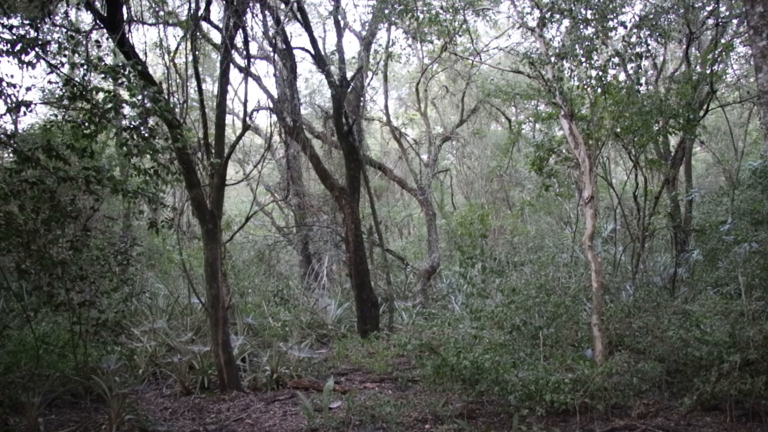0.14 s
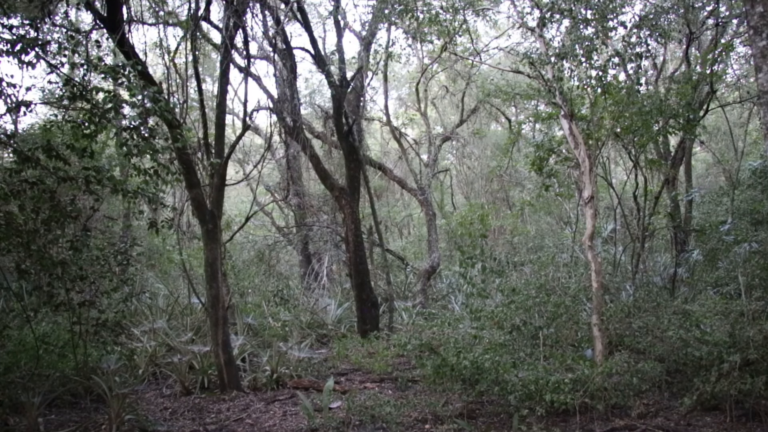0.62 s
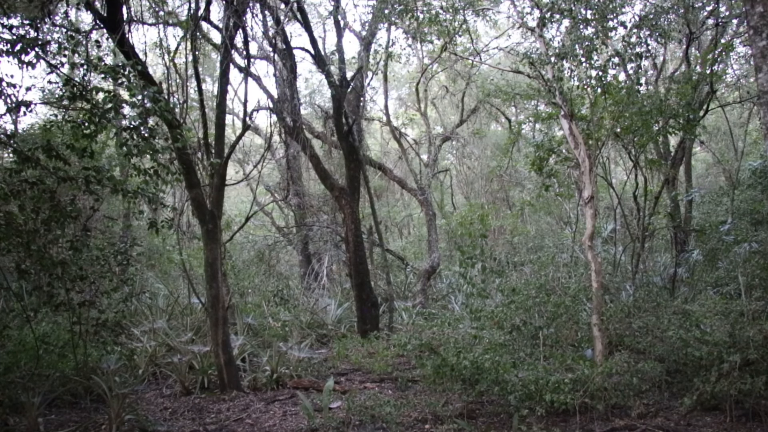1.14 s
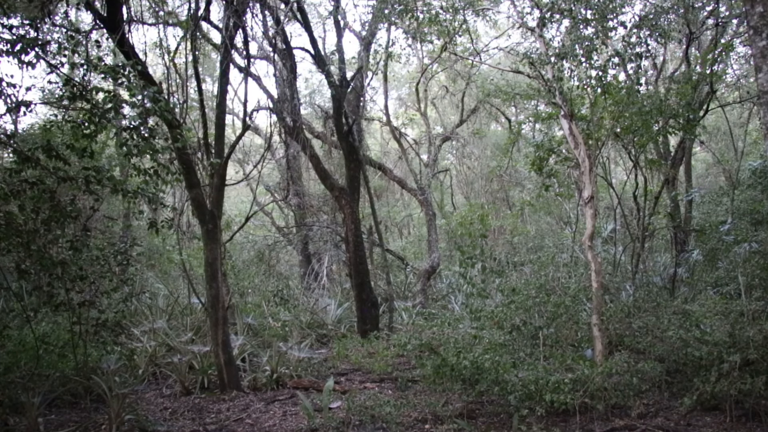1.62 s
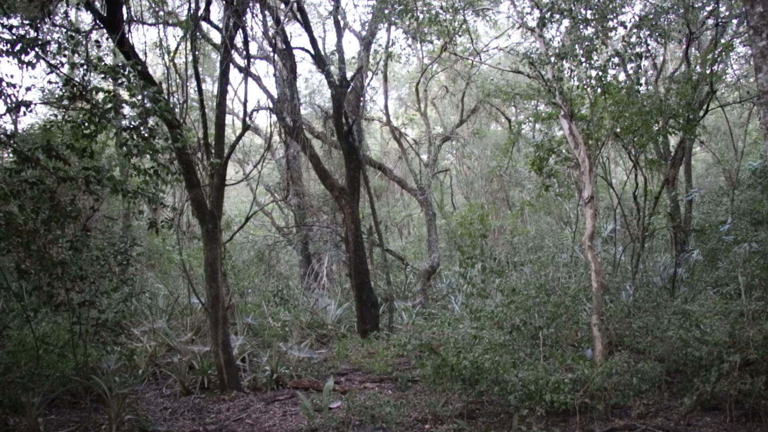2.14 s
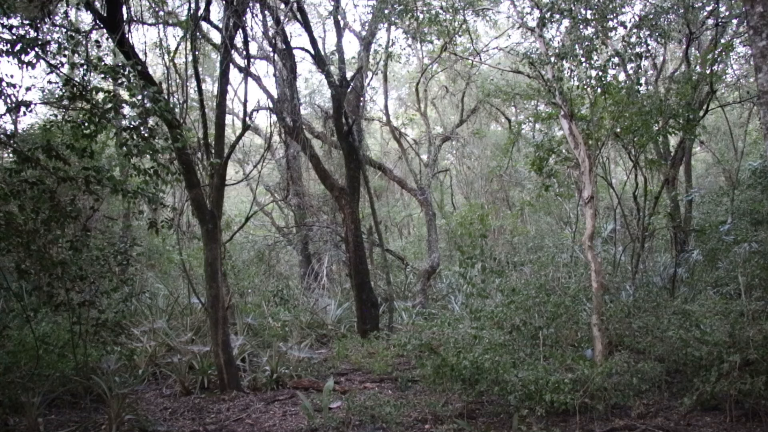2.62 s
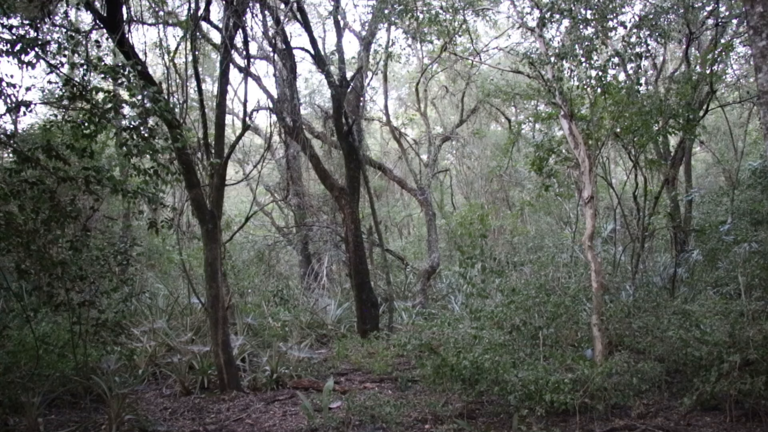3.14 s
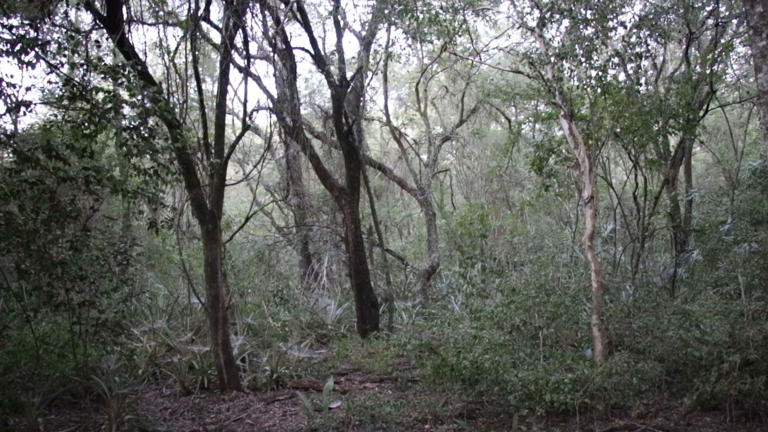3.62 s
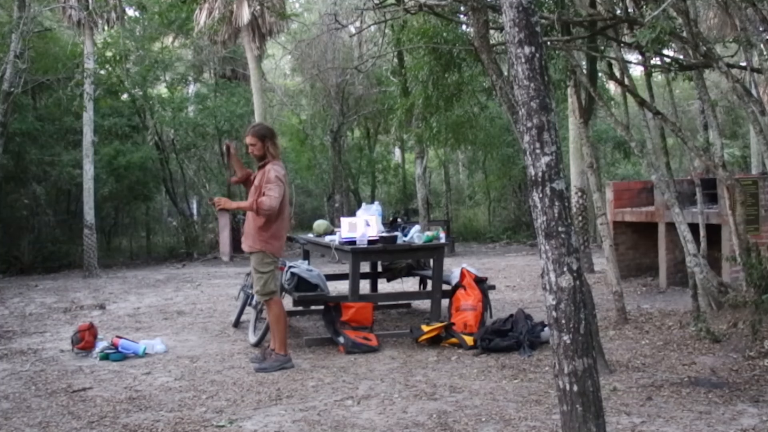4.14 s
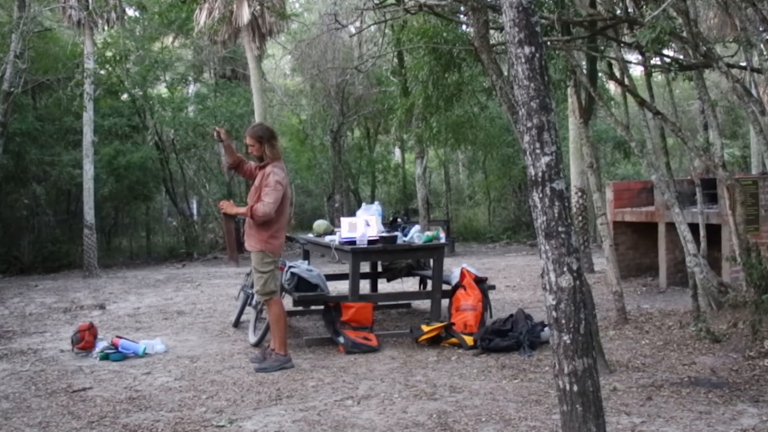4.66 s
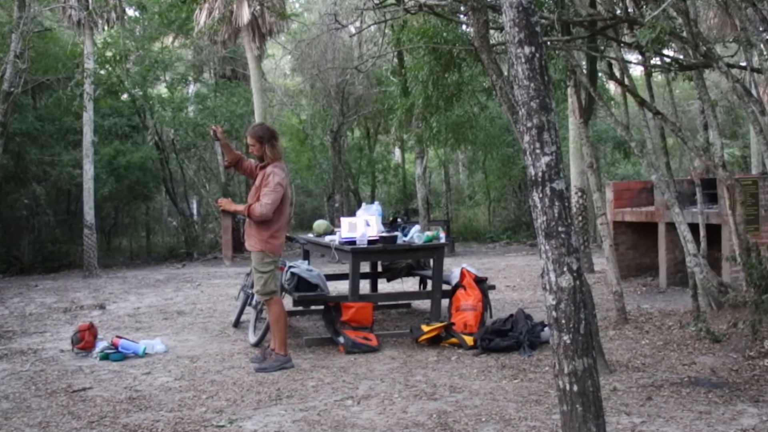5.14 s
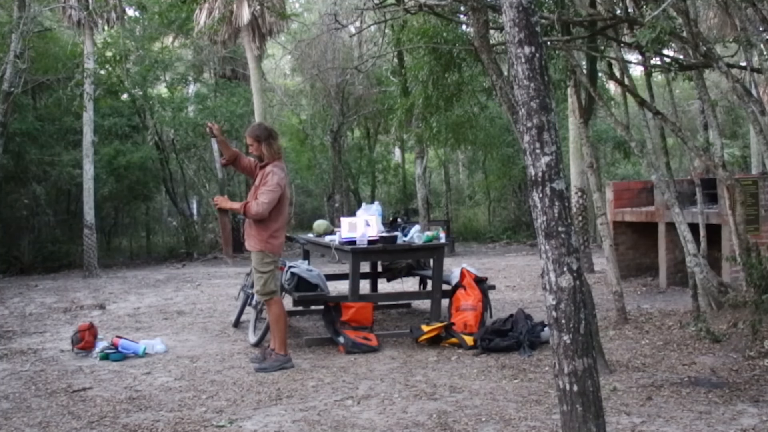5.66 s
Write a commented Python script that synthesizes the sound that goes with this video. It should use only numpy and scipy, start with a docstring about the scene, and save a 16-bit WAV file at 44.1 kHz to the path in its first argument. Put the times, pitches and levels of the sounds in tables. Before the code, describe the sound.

Loud shrill cicadas in a dusk forest: a steady piercing buzz, a sweeping hiss, and a fast chirping trill that stops near the end.

```python
"""Cicadas sing in a forest at dusk, heard by one microphone. From the start, one buzzes steadily near 9 kHz with ringing
ribs, one bends its body so that the hiss of its clicks sweeps down and up, and one trills rising chirps near 3 kHz by
striking the tones of its body. Trunks scatter them all as echoes, and a far chorus and still air, both shaped noise,
fill the gaps over a low murmur that comes and goes. A distant animal hoots faintly, a wavering tone with its octave,
at about 1.7 s and again at about 4.1 s. The trill breaks off at about 4.7 s, and the other singers go on."""
import sys
import numpy as np
from scipy import signal
from scipy.fft import rfft, irfft, next_fast_len
from scipy.io import wavfile
from scipy.ndimage import uniform_filter1d

SR = 44100
rng = np.random.default_rng(int(sys.argv[2]) if len(sys.argv) > 2 else 0)


def ratio(d):
    """dB to gain"""
    e = np.asarray(d, float) / 20
    return 10 ** e


def transcribe(u):
    """Save the signal u as a 16-bit wav file named by the first command-line argument.

    u: samples, shape (n,) or (channels, n), limited to [-1, 1]; the rate is SR.
    q: integer samples, one column per channel.
    """
    v = np.clip(np.atleast_2d(u).T, -1, 1)
    q = np.round(v * 32767).astype(np.int16)
    wavfile.write(sys.argv[1], SR, q)


N = 254236  # length of the scene in samples


def unit(x):
    """Scales x to an rms of 1."""
    return x / np.sqrt(np.mean(x ** 2) + 1e-20)


def along(points, hz):
    """Reads each column after the frequency at the pitches hz, on a log axis."""
    f, *cols = np.transpose(points)
    return [np.interp(np.log(hz + 1), np.log(f + 1), c) for c in cols]


def curves(rows, t):
    """Reads each column after the time at the times t."""
    s, *cols = np.transpose(rows)
    return [np.interp(t, s, c) for c in cols]


def coloured(x, spectrum):
    """Makes each pitch in x louder or softer, as the (Hz, dB) spectrum says."""
    m = next_fast_len(N + 8192)
    gain = ratio(along(spectrum, np.fft.rfftfreq(m, 1 / SR))[0])
    return irfft(rfft(x, m) * gain, m)[:N]


def band(x, low_hz, high_hz, order):
    """Steep band-pass filter that never looks ahead in time."""
    return signal.sosfilt(signal.butter(order, [low_hz, high_hz], "bandpass", fs=SR, output="sos"), x)


def rings(s, hz, t60, size, length=256):
    """One dying sine per click, starting at time s; it falls at a rate of 60 dB in t60 seconds."""
    start = np.ceil(s * SR).astype(int)[:, None] + np.arange(length)
    since = start / SR - s[:, None]
    fade = ratio(-60 * since / np.reshape(t60, (-1, 1)))
    wave = size[:, None] * np.sin(2 * np.pi * hz[:, None] * since) * fade
    return np.bincount(start.clip(0, N).ravel(), wave.ravel(), N + 1)[:N]


def patchy(depth_db):
    """Noise whose level drifts in patches of time and pitch."""
    z = signal.stft(rng.standard_normal(N), nperseg=512)[2]
    field = rng.standard_normal(z.shape)
    field = uniform_filter1d(uniform_filter1d(field, 6, 0), 10, 1)
    return signal.istft(z * ratio(depth_db * unit(field)), nperseg=512)[1][:N]


BUZZ_HZ = 109.3  # average strokes a second, before the lead below
# How far the buzzer runs ahead of its beat: start_s, lead [strokes]
BUZZ_LEAD = [(0, 0), (1.7, 0), (2.4, .12), (2.9, .11), (3.2, -.02), (5, -.02), (5.1, .06), (5.77, .08)]
# Ribs buckling in each stroke: share [part of a stroke, 0-1], pitch_hz, t60_s, level_db
BUZZ_RIBS = [(.01, 9000, 0.011, -22), (0.101, 9200, 0.0015, -30), (0.191, 9400, 0.0074, -17.5),
             (0.218, 7400, 0.005, -23.5), (0.398, 8800, 0.0034, -17.5), (.41, 10800, 0.00061, -21),
             (.42, 14500, 0.0009, -51), (.61, 7700, 0.0048, -22), (.61, 9700, 0.0041, -26),
             (0.809, 9000, 0.0049, -20)]


def buzzer():
    """Each stroke of the sound plate buckles its ribs in turn; every rib rings at its own pitch."""
    t = np.arange(N) / SR
    share, pitch_hz, t60_s, level_db = np.transpose(BUZZ_RIBS)
    beat = np.arange(int(N / SR * BUZZ_HZ) + 1)[:, None] + share
    time_luck, pitch_luck, level_luck = rng.standard_normal((3,) + beat.shape)
    strokes_done = BUZZ_HZ * t + curves(BUZZ_LEAD, t)[0]
    s = np.interp(beat, strokes_done, t) + .000012 * time_luck
    s += .000008 * np.cumsum(rng.standard_normal((len(beat), 1)), 0)  # the beat drifts
    pitch = pitch_hz * (1 + 0.0021 * pitch_luck)
    size = ratio(level_db + 0.5 * level_luck)
    t60 = np.broadcast_to(t60_s, beat.shape)
    ribs = rings(s.ravel(), pitch.ravel(), t60.ravel(), size.ravel(), length=350)
    return band(ribs, 6920, 15300, order=6)  # so small a body radiates nothing low


REST_BEND, ROUND = .13, 1.5  # bend between two bows [0-1]; how pointed a bow is
SWELL_DB, SAG_DB = 2.5, 2.5  # effort builds up to each bend and is spent after it
WARM_UP_DB, WARM_UP_S = -11, 0.28  # the bender starts softly
# Each bend of the abdomen: start_s, deepest_s, straight_again_s, depth [about 0-1], level_db [at the deepest]
BODY_BENDS = [(-.25, 0.34, 0.49, 0.79, -29.5), (0.61, 0.698, 0.9, 0.99, -29), (.92, 1.03, 1.155, 0.93, -29),
              (1.24, 1.363, 1.51, 0.78, -29.5), (1.57, 1.688, 1.79, 0.94, -29),
              (1.915, 2.031, 2.11, 0.9, -29.5), (2.26, 2.37, 2.5, 0.88, -29.5),
              (2.635, 2.705, 2.91, 0.91, -30), (3, 3.094, 3.26, 0.75, -29), (3.37, 3.466, 3.64, 0.87, -30),
              (3.745, 3.848, 3.95, 0.7, -29.5), (4.112, 4.248, 4.36, 0.77, -30),
              (4.5, 4.63, 4.71, 0.87, -29.5), (4.906, 5.026, 5.126, 1.04, -30.5),
              (5.32, 5.427, 5.55, 1.02, -31)]


def posture(t):
    """Bend and level of the bending singer at times t: a rounded bow per row, effort swelling before it."""
    start, deepest, end, depth, db = np.transpose(BODY_BENDS)
    knots = np.c_[start, deepest, end].ravel()
    phase = np.interp(t, knots, np.tile([0, 1, 0], len(start)))
    bow = np.abs(np.sin(np.pi / 2 * phase)) ** ROUND
    bend = REST_BEND + (np.interp(t, deepest, depth) - REST_BEND) * bow
    effort_db = np.c_[db + SWELL_DB, db, db - SAG_DB].ravel()
    # one more swell after the last bend
    effort_s = np.r_[knots, 2 * start[-1] - start[-2]]
    level_db = np.interp(t, effort_s, np.r_[effort_db, db[-1] + SWELL_DB])
    return bend, level_db + WARM_UP_DB * np.clip(1 - t / WARM_UP_S, 0, 1)


# Colour of the bending singer, levels relative to each other:
# pitch_hz, straight_db, bent_db, turn [bend 0-1 at which this pitch is halfway]
BENDER_COLOUR = [(1596.7, -97, -90, .8), (2075, -64, -51, 0.9), (2900, -52, -34, 0.4),
                 (3350, -25, -9.5, 0.56), (4000, -18.5, -8, 0.59), (4570, -23, -2, 0.45),
                 (5400, -27.5, -9.5, 0.13), (5520, -20.5, -5, 0.21), (7050, -10, -2.5, 0.22),
                 (7050, -14, -9, 0.6), (9000, -6.5, -7.5, 0.2), (10800, -9.5, -18.5, 0.43),
                 (12100, -12, -22, 0.18), (12700, -10.5, -33, 0.23), (13900, -17.5, -46, 0.4),
                 (16560, -24, -44, 0.3)]


def bender():
    """Nearly regular clicks, about 650 a second, with noise; bending moves their colour down, pitch by pitch."""
    time_luck, level_luck = rng.standard_normal((2, 4000))
    s = np.cumsum((1 + .01 * time_luck) / 657)
    clicks = np.bincount((s * SR).astype(int).clip(0, N), ratio(0.74 * level_luck), N + 1)[:N]
    source = unit(clicks - clicks.mean()) + 1.8 * patchy(depth_db=0.7)
    hz, t, z = signal.stft(source, SR, nperseg=256)
    level_db = posture(t)[1]
    straight_db, bent_db, turn = (c[:, None] for c in along(BENDER_COLOUR, hz))
    hz = hz[:, None]
    # the change spreads out from the middle of the band
    lag_s = 0.022 * np.abs(np.log2((hz + 1) / 6500)) - .012
    bend = posture(t - lag_s)[0]
    bend = np.where(hz > 8500, bend ** 2.3, bend)  # the treble fails only near full bend
    bent_share = 1 / (1 + np.exp((turn - bend) / 0.17))
    colour = ratio(straight_db + (bent_db - straight_db) * bent_share)
    # set the average loudness of the whole song; level_db and the changing colour then shape it
    colour /= np.sqrt(np.mean(colour ** 2)) * np.std(source)
    swing = np.where(hz > 9500, .4, 1)  # the treble follows the singer's effort less closely
    level_db = level_db.mean() + swing * (level_db - level_db.mean())
    return signal.istft(z * colour * ratio(level_db), SR, nperseg=256)[1][:N]


STOP_S = 4.734  # the trill breaks off
TRILL_DB, TRILL_SCATTER_DB = -29.5, 0.1  # base level of the chirps, and how much it varies
# The triller's tempo wanders and slowly drops: start_s, begun [chirps begun so far]
TRILL_TEMPO = [(-.043, -1), (.013, 0), (.342, 6), (.454, 8), (.627, 11), (1.354, 24), (1.463, 26),
               (1.855, 33), (2.484, 44), (2.765, 49), (2.942, 52), (4.334, 76), (4.512, 79), (4.696, 82)]
# One chirp: after_s [since its start], sac_pitch_hz, click_rate_hz, level_db [added to the base level]
CHIRP_COURSE = [(.004, 2680, 330, 1.5), (0.01, 2740, 370, 2.5), (0.021, 2900, 400, 4),
                (0.029, 3190, 388, 0.5), (0.041, 3330, 387, -1), (0.048, 3340, 387, 3.2),
                (0.055, 3400, 387, -12.5)]
# Modes (natural tones) of the triller's body: pitch_hz, t60_s, level_db,
# reach_hz [how near the sac must be tuned to wake it]
BODY_MODES = [(2003, 0.047, -30.5, 800), (2377, 0.047, -9.5, 244), (2682, 0.024, -4, 310),
              (2788, 0.022, -4, 410), (2876, 0.027, -4, 740), (3082, 0.026, 0, 183),
              (3303, 0.024, -1.5, 334), (3533, 0.027, -0.5, 460)]
# Colour of the triller's bare click: pitch_hz, level_db [before a common boost]
SNAP_COLOUR = [(1700, -82), (2300, -49), (2700, -2), (3700, -10), (4100, -5.5), (4600, -16), (5200, -2),
               (7000, -29), (11000, -10), (13000, -17), (15500, -41)]


def triller():
    """Each chirp is clicks from two sides in turn; as the air sac's pitch climbs, higher body modes wake."""
    when, begun = np.transpose(TRILL_TEMPO)
    start = np.interp(np.arange(begun[0], begun[-1] + 1), begun, when)
    chirp_db = TRILL_DB + TRILL_SCATTER_DB * rng.standard_normal(len(start))

    # click times: add up the click rate, then find when each click is due
    fine = np.linspace(CHIRP_COURSE[0][0], CHIRP_COURSE[-1][0], 200)
    count = np.cumsum(curves(CHIRP_COURSE, fine)[1]) * (fine[1] - fine[0])
    order = np.arange(20)
    second_side = order % 2
    time_luck, level_luck = rng.standard_normal((2, len(start), 20))
    chirp_luck = rng.standard_normal((len(start), 1))
    due = order + .45 * chirp_luck + 0.14 * second_side
    after = np.interp(due, count, fine) + .00003 * time_luck
    s = (start[:, None] + after).ravel()

    sac_hz, _, course_db = curves(CHIRP_COURSE, after.ravel())
    click_db = chirp_db[:, None] + 7.5 - 4.7 * second_side + 1.0 * level_luck
    size = ratio(click_db.ravel() + course_db) * (s > 0) * (s < STOP_S)
    s = s.clip(0)
    at = (s * SR).astype(int)

    body = np.zeros(N)
    ring_s = np.arange(2000) / SR
    onset = np.sin(np.pi / 2 * np.minimum(ring_s / 0.0035, 1)) ** 2  # each ring builds up over 3.5 ms
    for hz, t60, mode_db, reach in BODY_MODES:
        nearness = np.exp(-((sac_hz - hz) / reach) ** 2 / 2)
        woken = nearness * ratio(mode_db + 1.2 * rng.standard_normal(len(s)))
        blows = np.bincount(at, size * woken, N)[:N]
        ring = rings(np.zeros(1), np.array([hz]), t60, np.ones(1), length=2000)[:2000]
        body += signal.fftconvolve(blows, ring * onset)[:N]

    # the wings clamp the body at the end of each chirp
    t = np.arange(N) / SR
    since = t - start[np.searchsorted(start, t) - 1]
    clamped = (since > .0525) | (since < .004) | (t > STOP_S)
    body *= ratio(-12 * uniform_filter1d(1. * clamped, size=70))
    snaps = np.bincount(at, size, N)[:N]
    return body + ratio(19) * coloured(snaps, SNAP_COLOUR)


# How long echoes last: pitch_hz, t60_s
WOOD_ECHO = [(500, 0.3), (3000, 0.53), (9000, 0.1), (15000, 0.051)]


def trunks(x):
    """Scattered echoes from the trees, made with fading noise; the high treble dies first."""
    hz, t, z = signal.stft(rng.standard_normal(SR), SR, nperseg=256)
    fade = ratio(-60 * t / along(WOOD_ECHO, hz)[0][:, None])
    tail = signal.istft(z * fade, SR, nperseg=256)[1]
    late = np.pad(x, (300, 0))  # echoes begin 300 samples late
    return signal.fftconvolve(late, tail / np.linalg.norm(tail))[:N]


# Colour of the far chorus, levels relative to each other: pitch_hz, level_db
FAR_COLOUR = [(1900, -86), (2250, -34.5), (2650, -23.5), (3500, -18), (4000, -37), (5500, -19.5),
              (7000, -30), (7800, -5.5), (8300, -9), (9300, -7), (9900, -5), (10400, -20.5), (11500, -47),
              (15600, -48)]


def far_chorus():
    """Far cicadas blurred to a hiss: patchy noise with their colour."""
    return ratio(-32.5) * unit(coloured(patchy(depth_db=-1.6), FAR_COLOUR))


# Colour of the still air, levels relative to each other: pitch_hz, level_db
AIR_COLOUR = [(15, -45), (25, -13), (59, -2.5), (130, 3.5), (300, 4), (600, 2.5), (1250, 0.5), (2100, 3.5),
              (3000, -36), (5000, -64)]


def still_air():
    """The faint, mostly low noise of still air."""
    return ratio(-60) * unit(coloured(rng.standard_normal(N), AIR_COLOUR))


MURMUR_FADE_S = 0.071  # each fade is centred on the start or end of its spell
# Spells of low murmur: start_s, end_s, level_db
MURMUR_SPELLS = [(.05, .65, -64.5), (1.45, 2.05, -70), (2.583, 2.76, -65), (5.31, 5.95, -61)]


def murmur():
    """A blur of far low calls: patchy noise, strongest near 510 Hz, that fades in and out."""
    colour = [(120, -20), (280, -3.5), (400, -5.5), (510, 5.0), (640, -6), (850, -5), (1400, -34)]
    noise = unit(coloured(patchy(depth_db=1.5), colour))
    t, level = np.arange(N) / SR, np.zeros(N)
    for start, end, db in MURMUR_SPELLS:
        inside = np.minimum(t - start, end - t)
        level += ratio(db) * np.clip(inside / MURMUR_FADE_S + .5, 0, 1)
    return level * noise


# One list per hoot: start_s, pitch_hz, level_db [rms], octave_db [rms]
HOOT_CALLS = [
    [(1.66, 512, -67, -98), (1.72, 516, -67, -76), (1.8, 528, -63, -69), (1.845, 535, -70, -72),
     (1.86, 525, -54, -73), (1.885, 510, -69, -90)],
    [(4.125, 440, -84, -85), (4.14, 467, -49.5, -57), (4.155, 512, -78, -52), (4.165, 487.2, -72, -70),
     (4.2, 509, -64, -63), (4.26, 534, -57, -73), (4.3, 545, -83, -88)],
]


def hoots():
    """A soft far call: a wavering tone with its octave."""
    t, out = np.arange(N) / SR, np.zeros(N)
    for call in HOOT_CALLS:
        hz, db, octave_db = curves(call, t)
        turn = 2 * np.pi * np.cumsum(hz) / SR
        tone = ratio(db) * np.sin(turn) + ratio(octave_db) * np.sin(2 * turn)
        sounding = (t > call[0][0]) * (t < call[-1][0])
        out += sounding * np.sqrt(2) * tone
    return out


def scene():
    """All singers, their echoes and the background, the same in both channels."""
    buzz, bend, trill, hoot = buzzer(), bender(), triller(), hoots()
    echoes = trunks(ratio(-9) * buzz + ratio(-12) * bend + ratio(-10.5) * trill + ratio(-16) * hoot)
    background = far_chorus() + still_air() + murmur()
    return np.tile(buzz + bend + trill + hoot + echoes + background, (2, 1))


def low_pass(x):
    """Removes everything above the highest recorded frequency."""
    return signal.sosfilt(signal.butter(12, 15760, fs=SR, output="sos"), x)


def record(dry):
    """One microphone feeds both channels."""
    return low_pass(dry)


dry = scene()
out = record(dry)
transcribe(out)
```